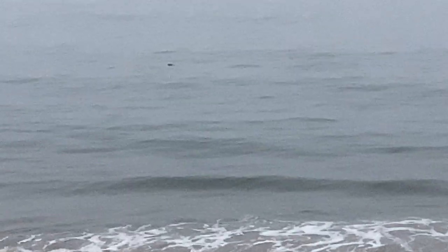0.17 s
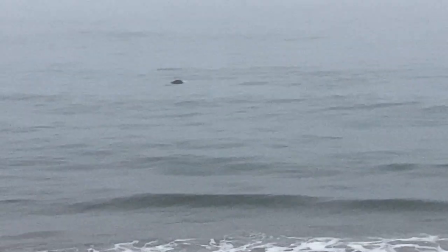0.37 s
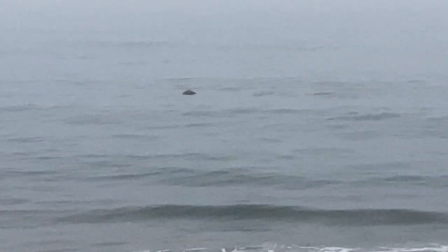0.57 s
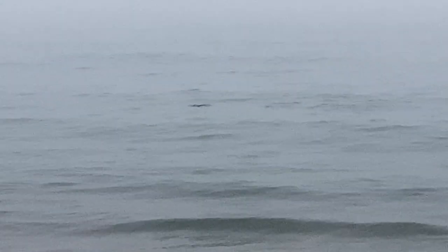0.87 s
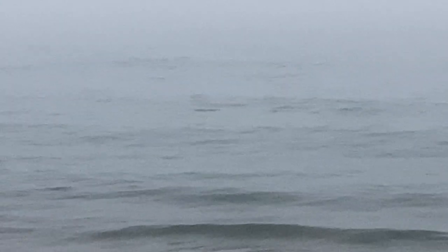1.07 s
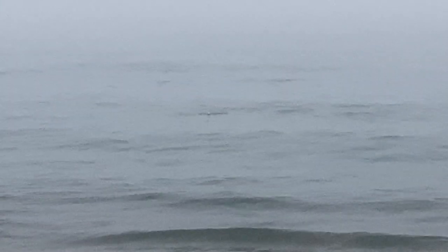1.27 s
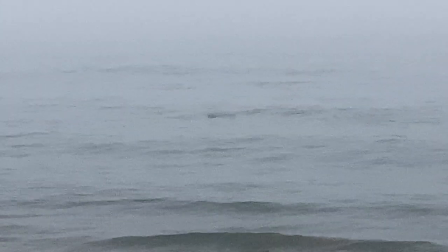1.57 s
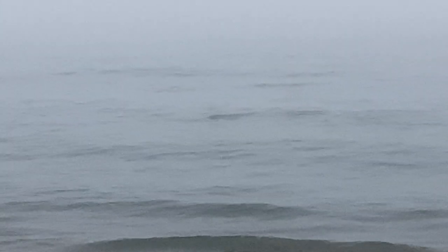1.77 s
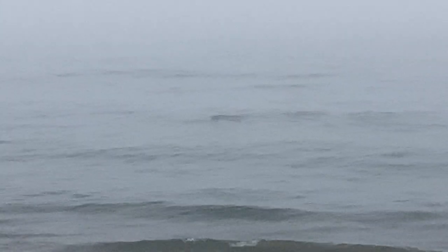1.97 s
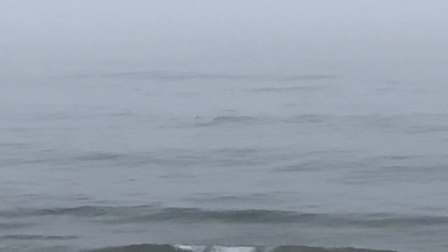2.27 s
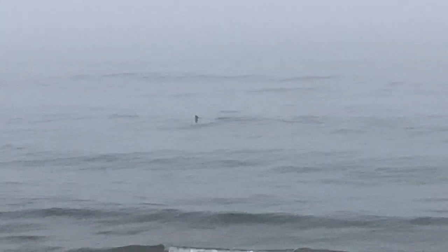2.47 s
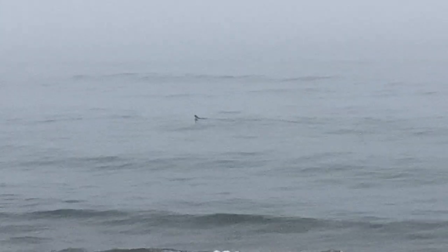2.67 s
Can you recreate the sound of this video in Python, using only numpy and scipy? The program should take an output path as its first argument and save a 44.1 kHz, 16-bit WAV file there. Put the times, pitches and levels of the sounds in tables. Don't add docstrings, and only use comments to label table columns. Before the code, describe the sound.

Gentle ocean wave wash fades over sand, a bird rasps faintly, and another small wave breaks

```python
import sys
import numpy as np
from scipy import signal
from scipy.fft import rfft, irfft, next_fast_len
from scipy.io import wavfile
from scipy.ndimage import uniform_filter1d, map_coordinates

SR = 44100
rng = np.random.default_rng(int(sys.argv[2]) if len(sys.argv) > 2 else 0)


def makeup_ratio(level_db):
    decades = np.asarray(level_db, float) / 20
    return 10 ** decades


def wav_out(sig):
    wavfile.write(sys.argv[1], SR, np.round(np.clip(np.atleast_2d(sig).T, -1, 1) * 32767).astype(np.int16))


N = 124803

# (time [s], level [dB])
DRAINING_LEVEL = [(0, -40.5), (.25, -41.5), (.5, -42), (.7, -43.5), (.93, -43.5), (1.1, -46), (1.45, -48.5),
                  (1.55, -51.5), (1.85, -52.5), (2.1, -52), (2.83, -44.5)]
# (time [s], level [dB])
BREAKER_LEVEL = [(0, -83), (1.8, -87), (1.89, -55.5), (2.1, -50), (2.17, -47), (2.21, -45), (2.26, -43.5),
                 (2.29, -41.5), (2.4, -41), (2.55, -41.5), (2.7, -41.5), (2.83, -40.5)]
# (frequency [Hz], density [dB per Hz])
FOAM_COLOUR = [(200, -5.5), (420, -3.5), (750, 0.5), (1300, -4), (2200, -9), (2950, -13), (3600, -8.5),
               (6000, -17)]
# (frequency [Hz], density [dB per Hz])
SPILL_COLOUR = [(200, -2.5), (400, -3), (870, 0.5), (1200, -10.5), (1900, -3), (2600, -5), (3100, -7.5),
                (6000, -12.5)]
# (frequency [Hz], density [dB per Hz])
FAR_COLOUR = [(100, -2.5), (300, 0.5), (420, -6.5), (560, 2), (950, 0.5), (1350, -4.5), (1900, -2.5),
              (3000, -12.5)]
# (frequency [Hz], density [dB per Hz])
FIZZ_COLOUR = [(2000, -32), (5000, 3), (7000, -1), (11000, 4), (16000, -2)]
# (frequency [Hz], density [dB per Hz])
SPRAY_COLOUR = [(2000, -28), (3500, -3), (5000, 7), (7000, -1), (9000, -1), (11000, -3), (13500, -5),
                (16000, -3)]
# (frequency [Hz], density [dB per Hz])
WIND_COLOUR = [(40, 1.5), (90, 2), (200, -6), (400, -12)]
# (time [s], level [dB])
GUST_LEVEL = [(0, -52), (.17, -56.5), (.33, -50), (.5, -51), (.6, -52), (.8, -59), (.95, -54), (1.2, -54),
              (1.37, -49.5), (1.5, -54), (1.8, -53), (2.0, -58), (2.2, -58), (2.35, -52), (2.5, -58),
              (2.6, -56), (2.72, -52), (2.83, -54)]
# (time [s], level [dB], centre [Hz], 60 dB decay time [s])
SLAPS = [(.245, -48.5, 4800, 0.14), (.7, -48, 8400, .12), (1.04, -48, 5800, 0.092), (.76, -49, 1640, 0.28),
         (1.88, -56.5, 2500, 0.5), (1.89, -42.5, 890, 0.11), (2.275, -44, 910, 0.13),
         (2.279, -44.5, 2600, 0.13), (2.08, -40, 11000, 0.037), (2.46, -40, 1900, 0.08),
         (2.68, -43.5, 2000, 0.22), (.11, -46, 870, .2), (.42, -44.5, 700, 0.28), (.73, -46, 940, .15),
         (0.23, -58, 5200, 0.17), (2.17, -52, 4500, .25), (2.19, -47, 2200, 0.11), (2.25, -44, 680, .15),
         (2.39, -48, 820, 0.12), (2.8, -44, 720, .2), (1.36, -51, 950, 0.28), (1.19, -50, 1000, 0.23),
         (2.2, -51, 800, .15), (2.73, -46.5, 860, 0.22), (.36, -47.5, 285, 0.21), (.56, -49, 280, 0.19),
         (1.33, -52, 280, 0.18)]
# (time [s], length [s], level [dB], top strand gain [dB])
BIRD_NOTES = [
    (.89, .045, -53.5, -9),
    (.962, .078, -52.5, -3),
    (1.1, .036, -55, -10),
    (1.392, .068, -49.5, -4.5),
    (1.665, .075, -63, 3.5),
    (1.19, .05, -58, -8),
    (1.5, .035, -59, -8),
]
# (frequency [Hz], gain [dB])
MICROPHONE = [(20, -50), (30, -41), (60, -6.5), (85, 1), (11500, 1), (13000, -5.5), (14500, -12),
              (15700, -23)]


def unit(x):
    return x / np.sqrt(np.mean(x ** 2) + 1e-20)


def along(points, hz):
    f, db = np.transpose(points)
    return np.interp(np.log(hz + 1), np.log(f + 1), db)


def curve(rows):
    s, db = np.transpose(rows)
    return np.interp(np.arange(N) / SR, s, db)


def wobble(rate):
    knots = rng.standard_normal(int(N * rate / SR) + 4)
    return map_coordinates(knots, [np.arange(N) * rate / SR])


def filtered(x, response):
    m = next_fast_len(len(x) + 8192)
    return irfft(rfft(x, m) * response(np.fft.rfftfreq(m, 1 / SR)), m)[:len(x)]


def turbulence(patchy_db):
    z = signal.stft(rng.standard_normal(N), nperseg=512)[2]
    field = uniform_filter1d(rng.standard_normal(z.shape), size=6, axis=0)
    field = uniform_filter1d(field, size=10, axis=1)
    gain_db = np.clip(patchy_db, 0, 1.5) * unit(field)
    return signal.istft(z * makeup_ratio(gain_db), nperseg=512)[1][:N]


def bubbles(spread_db, count):
    at, pitch, size = rng.random((count, 3)).T
    hz = 300 * 50 ** pitch
    cycles = np.arange(64) / 16
    sample = (cycles[None] / hz[:, None] * SR + at[:, None] * N).astype(int)
    ring = np.sin(2 * np.pi * cycles * (1 + 0.05 * cycles)) * np.exp(-cycles / 0.69)
    weight = makeup_ratio(-spread_db * np.log(1 - .98 * size))
    return np.bincount(sample.ravel(), (weight[:, None] * ring).ravel(), N + SR)[:N]


def water(colour, patchy_db, grain_db, spread_db, count):
    mixed = unit(turbulence(patchy_db)) + makeup_ratio(grain_db) * unit(bubbles(spread_db, count))

    def response(f):
        octaves_above = np.log2(np.maximum(f / colour[-1][0], 1))
        return makeup_ratio(along(colour, f) - 3.3 * octaves_above)

    return unit(filtered(mixed, response))


def wave(level, colour, hiss_colour, hiss_db, lead_s, surge_db):
    surge = makeup_ratio(surge_db * (wobble(4.3) + 0.28 * wobble(14)))
    body = water(colour, patchy_db=0.5, grain_db=-7.5, spread_db=3, count=30000)
    hiss = water(hiss_colour, patchy_db=.6, grain_db=-15, spread_db=3, count=30000)
    early_level = np.subtract(level, [lead_s, 0])
    return surge * (makeup_ratio(curve(level)) * body + makeup_ratio(hiss_db + curve(early_level)) * hiss)


def draining_foam():
    return wave(DRAINING_LEVEL, FOAM_COLOUR, FIZZ_COLOUR, hiss_db=-11.5, lead_s=0, surge_db=-0.2)


def far_surf():
    roar = water(FAR_COLOUR, patchy_db=0.75, grain_db=-19.0, spread_db=-1.0, count=5000)
    return makeup_ratio(-45.5 + 0.62 * wobble(2.12)) * roar


def wind():
    colour = WIND_COLOUR + [(1200, -60)]
    rumble = filtered(rng.standard_normal(N), lambda f: makeup_ratio(along(colour, f)))
    return makeup_ratio(-2.5 + curve(GUST_LEVEL) + 0.87 * wobble(7.5) + 0.2 * wobble(1.6)) * unit(rumble)


def slaps():
    out, t = np.zeros(N + SR), np.arange(SR // 4) / SR
    for s, db, hz, t60 in SLAPS:
        noise = rng.standard_normal(len(t))
        puff = unit(filtered(noise, lambda f: 1 / (1 + ((f - hz) / (0.24 * hz)) ** 2)))
        onset = 1 - np.exp(-t / .012)
        out[round(s * SR):][:len(t)] += makeup_ratio(db - 60 * t / t60) * onset * puff * 2
    return out[:N]


def breaker():
    return wave(BREAKER_LEVEL, SPILL_COLOUR, SPRAY_COLOUR, hiss_db=-12, lead_s=.03, surge_db=0.4)


def bird():
    flutter_hz, flutter_depth, edge_s = 95, .25, .004
    sag_hz, swing_hz = 110, 110
    hoarse_rad, uneven_db = .06, 2.2
    out, t = np.zeros(N + SR), np.arange(SR // 4) / SR
    for s, length, db, top_db in BIRD_NOTES:
        gate = np.clip(np.minimum(t, length - t) / edge_s, 0, 1)
        flutter = 2 * np.pi * flutter_hz * t + np.cumsum(rng.normal(0, 0.054, len(t)))
        throb = 1 + flutter_depth * np.cos(flutter)
        for hz, gain_db, swing in [(3400, -2, 1), (3760, -5, 1), (4620, top_db, 1.4)]:
            pitch = hz - sag_hz * t / length + swing * swing_hz * np.sin(flutter)
            phase = np.cumsum(2 * np.pi * pitch / SR + rng.normal(0, hoarse_rad, len(t)))
            level = makeup_ratio(db + gain_db + uneven_db * wobble(126)[:len(t)])
            out[round(s * SR):][:len(t)] += level * gate * throb * np.sin(phase)
    return out[:N]


def scene():
    mono = draining_foam() + far_surf() + wind() + slaps() + breaker() + bird()
    return np.array([mono, mono])


def low_pass(x):
    return signal.sosfilt(signal.butter(12, 15720, fs=SR, output="sos"), x)


def record(dry):
    shelf_hz, shelf_db = 6190, -4.5
    edge_hz, edge_swing_db = 13900, 2
    start_s = .03626
    x = filtered(dry[0], lambda f: makeup_ratio(along(MICROPHONE, f) + shelf_db * (f > shelf_hz)))
    top_edge = filtered(x, lambda f: f > edge_hz)
    x = x + (makeup_ratio(edge_swing_db * np.minimum(wobble(18), .3)) - 1) * top_edge
    x = x * np.clip((np.arange(N) / SR - start_s) / .0002 + .5, 0, 1)
    return low_pass(np.array([x, x]))


dry = scene()
out = record(dry)
wav_out(out)
```